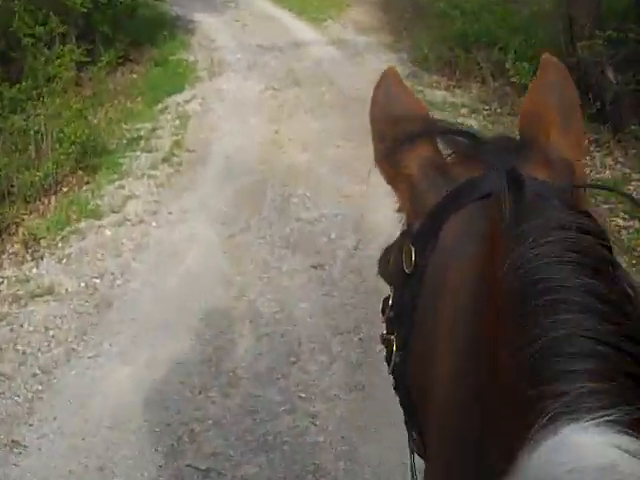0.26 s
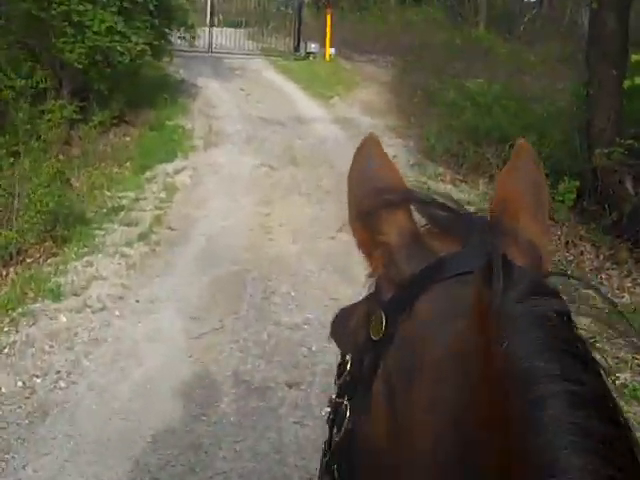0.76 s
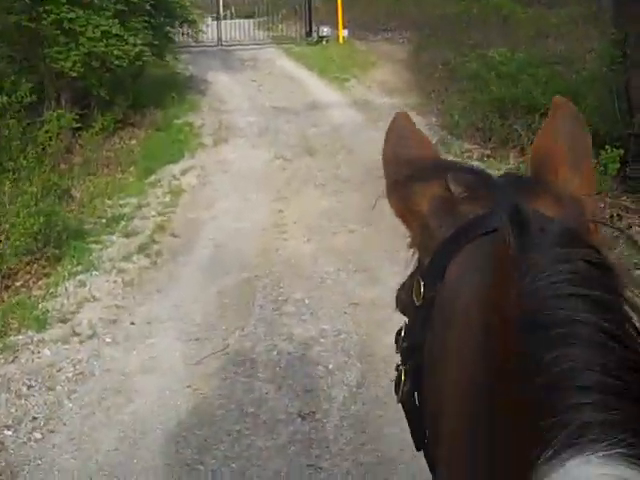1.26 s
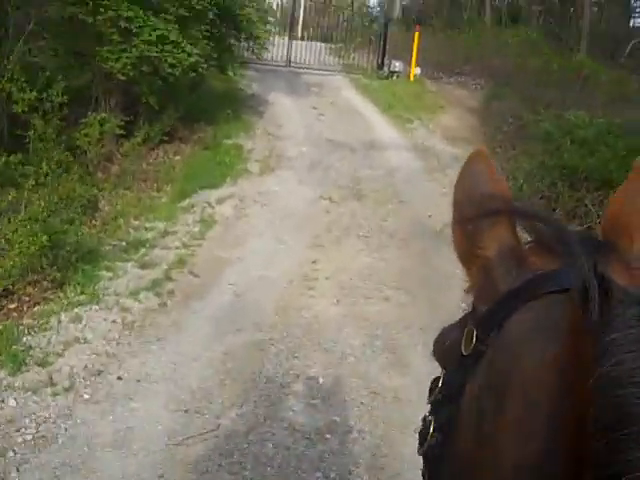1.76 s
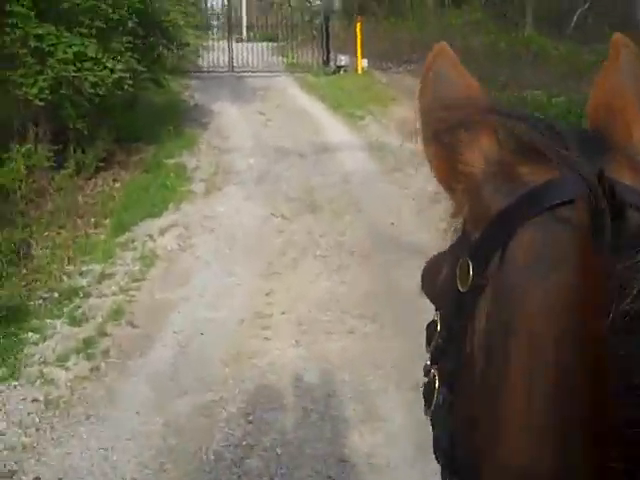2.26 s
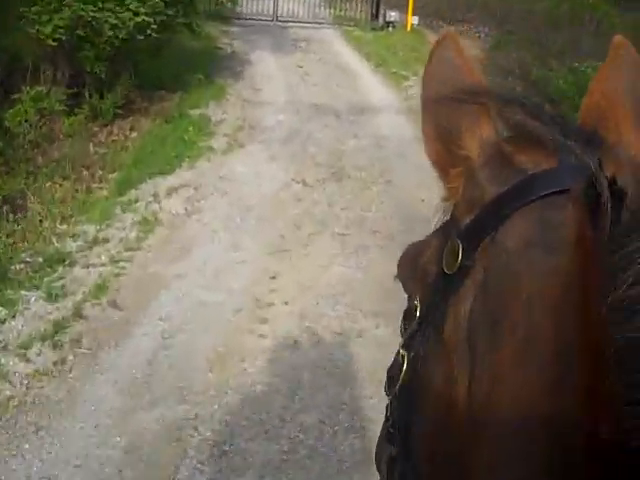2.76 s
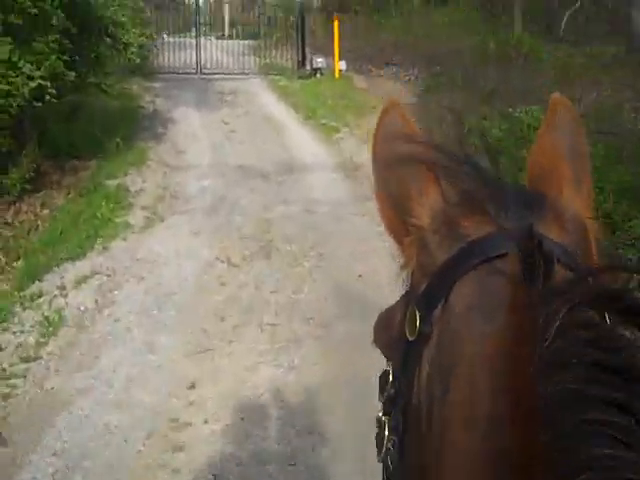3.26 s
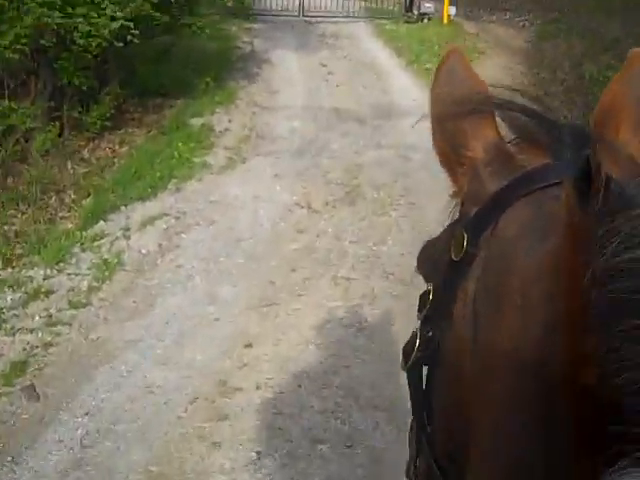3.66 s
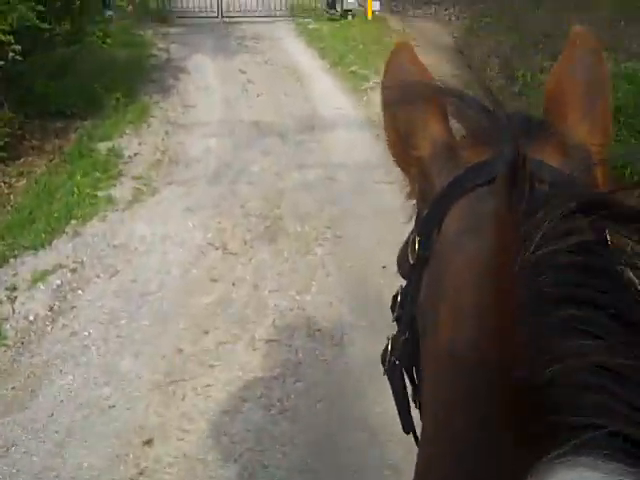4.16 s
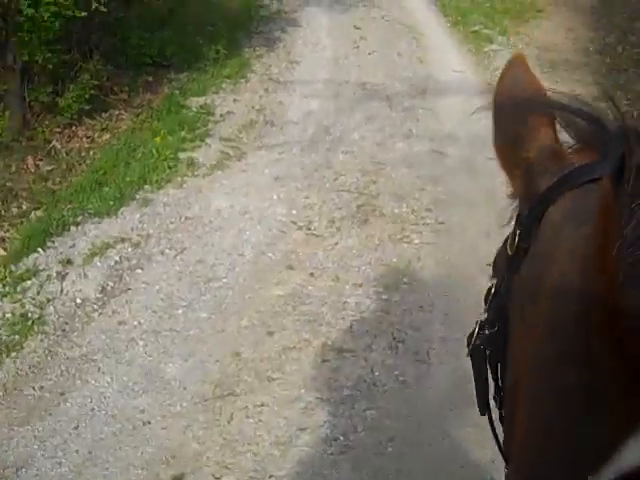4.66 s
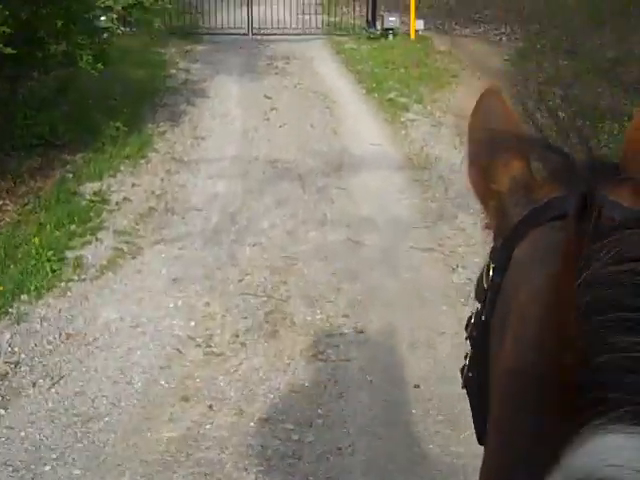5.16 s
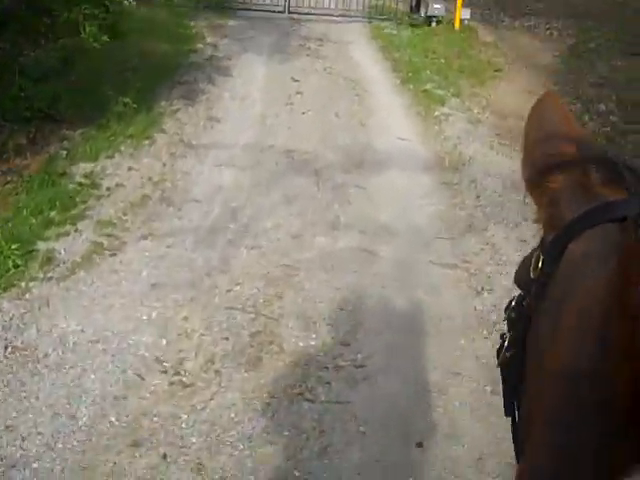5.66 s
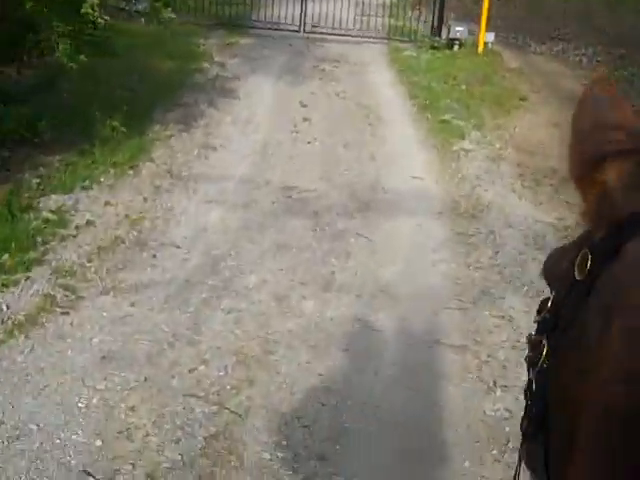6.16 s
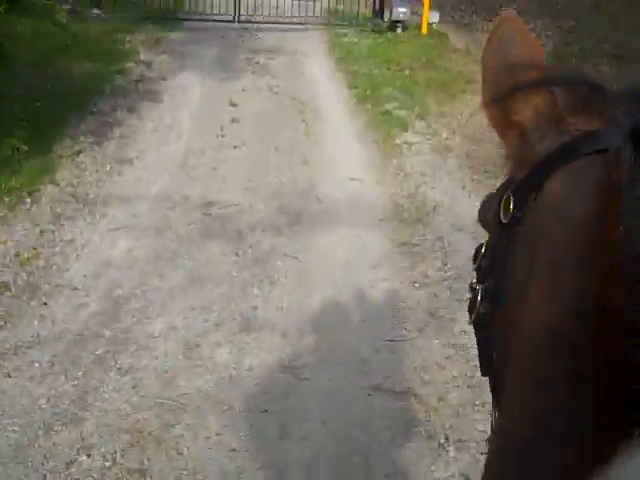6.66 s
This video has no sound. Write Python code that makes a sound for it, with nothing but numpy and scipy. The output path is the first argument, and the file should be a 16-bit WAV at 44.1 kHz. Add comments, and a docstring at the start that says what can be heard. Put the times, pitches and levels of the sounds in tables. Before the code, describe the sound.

A horse walks along a gravel drive between trees, heard close from the saddle. Hooves thud and crunch steadily, mixed with sharp clicks and small bridle jingles over a soft rustle of leaves. Wind buffets the microphone at the start. A bird then whistles a brief phrase, after which the hooves knock more hollowly. The gusts return near the end, along with the loudest click.

```python
"""A horse walks down a gravel drive between trees, heard from a small camera in the rider's hand.
From the start hooves thud and gravel crunches over rustling leaves, sharp clicks ring in short hollow
modes, the bridle jingles and gusts buffet the two microphone ports. Just after 2 s a bird whistles two
arches, between short notes, into the wood. From about 3 s the hooves knock more hollowly. Near 6 s
the gusts pick up again, and the loudest click lands at 6.3 s."""
import sys
import numpy as np
from scipy import signal
from scipy.fft import rfft, irfft
from scipy.io import wavfile
from scipy.ndimage import uniform_filter1d

SR = 44100
rng = np.random.default_rng(int(sys.argv[2]) if len(sys.argv) > 2 else 0)


def dump_mix(stems):
    """Bounce the given channels to the path in sys.argv[1] as a 16-bit WAV at rate SR."""
    frames = np.atleast_2d(stems).T  # one column per channel
    limited = np.clip(frames, -1, 1)  # hard clip at full scale
    pcm = np.round(limited * 32767).astype(np.int16)
    wavfile.write(sys.argv[1], SR, pcm)


N = 304290

# tone of the left port over the right: f/Hz, level/dB
PORT_TILT = [(250, 0.5), (700, -1.5), (2500, 1.5), (6000, -0.5), (8000, 7), (11500, 10), (13700, 8.5)]
# spectrum of leaves and microphone hiss: f/Hz, level/dB
AIR_EQ = [(59, -4.5), (100, -7), (259, -1.5), (590, -7), (949, -5.5), (1730, -13.5), (2560, -13),
          (4850, -14.5), (7800, -7), (9990, -23), (14000, -26), (14400, -75)]
# how alike that bed is in both ports: f/Hz, correlation
AIR_LIKENESS = [(60, 0.95), (240, 0.97), (950, 0.94), (3760, 0.018), (15000, 0.043)]
# gusts: middle t/s, length/s, left level/dB, right level/dB
GUSTS = [(0.256, 0.13, -27.5, -41), (0.436, 0.028, -27, -32), (0.515, 0.026, -22.5, -27),
         (0.554, 0.019, -20.5, -37), (0.527, 0.19, -36, -36.5), (1.127, 0.024, -22.5, -24.5),
         (1.2, 0.2, -41, -42.5), (1.275, 0.034, -34, -51), (4.374, 0.26, -47, -50),
         (5.719, 0.084, -37.5, -64), (5.839, 0.04, -37.5, -38), (6.137, 0.17, -33, -37),
         (6.488, 0.058, -27, -49), (6.55, 0.02, -19.5, -36), (6.595, 0.074, -35.5, -43)]
# spectrum of wind on a port: f/Hz, level/dB
BUFFET_EQ = [(30, -32), (70, -4), (130, -3), (190, -9.5), (280, -14.5), (900, -67)]

# cues for the bird's arches and short pips: t/s, level/dB
ARCH_CUES = [(2.26, -38.5), (2.501, -39)]
PIP_CUES = [(2.15, -49), (2.4, -48), (2.64, -45.5)]
# contours of an arch, a pip and the falling lead-in: t/s into the note, f/Hz, level/dB
ARCH_SHAPE = [(0, 2565, -44), (0.027, 2773, 3.5), (0.058, 2980, 6), (.092, 2958, 7), (.122, 2104, -2)]
PIP_SHAPE = [(0, 2070, -2), (.025, 2250, 5), (.06, 2300, -13)]
LEAD_IN_SHAPE = [(0, 2510, -51), (.03, 2090, -49)]

# gravel shoved aside by a hoof: peak t/s, length/s, crunch level/dB, rattle level/dB
SCUFFS = [(0.368, 0.12, -42, -42.5), (0.836, 0.67, -53.5, -53), (1.095, 0.043, -39, -37.5),
          (1.36, 0.29, -49.5, -51), (1.793, 0.2, -48, -46), (2.29, 1, -54, -60.5),
          (2.511, 0.077, -65, -41.5), (3.187, 0.12, -49, -50), (3.46, 0.35, -44.5, -67),
          (3.648, 0.16, -48, -39), (4.05, 0.043, -38, -27.5), (4.413, 0.57, -44, -49),
          (4.565, 0.13, -54, -48), (4.994, 0.51, -60, -48), (5.244, 0.14, -56, -42),
          (5.473, 0.3, -52.5, -44.5), (5.946, 0.14, -56, -46), (6.132, 0.22, -66, -45),
          (6.342, 0.24, -54, -48), (6.568, 0.086, -67, -41.5), (6.677, 0.076, -36, -55),
          (6.734, 0.078, -37, -43), (6.853, 0.19, -46.5, -58)]
# spectra of the gravel's low crunch and high rattle: f/Hz, level/dB
CRUNCH_EQ = [(150, -10), (300, -1.5), (700, -7.5), (1000, -4), (1700, -16.5), (7000, -40)]
RATTLE_EQ = [(1500, -0.5), (2550, -1.5), (3300, -0.5), (5000, -2.5), (7300, 3.5), (10000, -9), (14000, -51)]
# stones of three sizes knocking together: f/Hz
STONES_HZ = (702, 940, 1320)

# pitched clinks: t/s, level/dB, f/Hz
CLINKS = [(0.708, -36, 3280), (0.708, -28, 7030), (1.6462, -25, 5730), (1.787, -24, 6720),
          (2.875, -17.5, 7480), (2.893, -43, 7600), (3.37, -33, 6450), (6.0474, -31, 5450),
          (6.454, -26.5, 7420), (6.534, -34, 7850), (6.542, -27, 6840)]
# a clink's quick and lingering decays: level/dB, t60/s
CLINK_DECAYS = [(8, 0.017), (-24, 0.029)]
# bridle jingles: t/s, level/dB
JINGLES = [(0.346, -34), (0.3654, -25), (0.403, -31.5), (0.4607, -35.5), (0.61, -37.5), (0.659, -34),
           (0.8653, -29.5), (1.3221, -30), (1.3434, -27), (1.4575, -31.5), (1.596, -29.5), (1.6038, -35),
           (1.709, -27.5), (2.2072, -35.5), (2.9301, -32.5), (3.4163, -28), (3.64, -33), (4.243, -37),
           (4.3505, -30), (4.3582, -39), (4.436, -33), (4.4505, -30), (4.9172, -33.5), (4.9325, -35),
           (5.0259, -29.5), (5.0327, -25.5), (5.221, -29), (5.294, -23.5), (5.3503, -34.5), (5.762, -42),
           (5.7847, -36), (5.796, -41), (5.9255, -27), (6.083, -33.5), (6.233, -33), (6.2552, -30),
           (6.283, -20), (6.4487, -41)]
# sharp clicks: t/s, level/dB, low ring offset/dB, middle ring offset/dB
CLICKS = [(0.2181, -36, -40, -26), (0.4296, -33, -20, -10), (0.7068, -29, -42, -19),
          (0.8228, -17.5, -17, -22), (1.361, -28, -3, 2), (1.6361, -20, 0, -0.5), (1.647, -24, -11, -33),
          (1.7869, -20, -11, -7), (2.2413, -37.5, -16, 2), (2.2514, -31, -9, 1), (2.4344, -31, -7.5, 1),
          (2.4673, -33, -7, -4), (2.4886, -22.5, -15, -31), (2.585, -30.5, -29, -10),
          (2.8752, -34, -54, -40), (3.024, -19, -23, -22), (3.1566, -35, -7, 3), (3.163, -31.5, -13, -2),
          (3.192, -33.5, -15, -2), (3.2263, -35.5, -17, -3), (3.2365, -35.5, -18, -10),
          (3.5029, -29.5, -14, -9), (4.0196, -25, -18, -27), (4.0327, -21.5, -16, -16),
          (4.0488, -35, -1.5, -30), (4.2216, -34.5, -14.5, -12), (4.343, -28.5, -6, 1),
          (4.3877, -18, -7, -1), (4.5173, -32.5, -9, -30), (4.5638, -32, -11, -21),
          (4.8394, -28.5, -10, -19), (5.272, -21, -3, 1.5), (5.3269, -33, -15, -10),
          (5.4341, -33.5, -0.5, 0.5), (5.4599, -28.5, -33, -24), (5.751, -29.5, -25, -27),
          (5.8378, -28.5, -6, 9), (5.8435, -29.5, -7, -1), (5.88, -26, -0.5, 2.5),
          (5.9418, -26.5, -22, -17), (6.048, -32.5, -30, -20), (6.0566, -28.5, -7, 1),
          (6.072, -27.5, -27, -6), (6.126, -30, -17, -6), (6.176, -29.5, -39, -33),
          (6.271, -10.5, -12, -1.5), (6.294, -32, -25, 3.5), (6.4166, -33.5, -7.5, -1),
          (6.4552, -33, -36, -39), (6.5338, -28, -26, -20), (6.7309, -28, -8.5, -2), (6.742, -34.5, -18, 6),
          (6.7792, -30, -33, -5.5)]
# a click's low, middle and bright modes: f/Hz, level/dB, nominal t60/s
CLICK_MODES = [(2560, 14, 0.017), (4074, 8.5, 0.013), (6090, 7, 0.0021)]
# EQ of a click's snap and grit: f/Hz, level/dB
SNAP_EQ = [(300, -31), (800, -7.5), (3300, -4.5), (5700, 3), (7600, 7), (10000, -9), (14000, -18.5),
           (15500, -47)]

# hoof beats: t/s, level/dB, thud f/Hz, knock offset/dB
HOOF_BEATS = [(0.099, -33, 464, -35), (0.583, -34.5, 430, -17), (0.839, -35.5, 330, -26),
              (1.062, -34.5, 453, -22), (1.311, -31.5, 404, -14), (1.547, -32.5, 274, -25),
              (1.727, -37, 400, -9), (1.786, -32.5, 356, -3), (2.023, -31.5, 463, -11.5),
              (2.278, -30.5, 353, -8), (2.498, -27.5, 254, -14.5), (2.683, -34, 382, -25),
              (2.716, -36, 262, -12), (2.944, -34, 454, -15), (3.152, -36, 298, 2), (3.397, -25, 265, -1.5),
              (3.559, -38, 476, -13), (3.611, -31, 417, -2.5), (3.841, -29.5, 468, -19),
              (4.015, -33, 418, 0), (4.298, -36.5, 382, -2.5), (4.514, -30.5, 294, 0.5),
              (4.753, -34.5, 272, -21), (4.838, -31.5, 485, -4.5), (4.948, -49.5, 507, 14.5),
              (4.994, -27, 325, 1.5), (5.222, -29.5, 276, -25), (5.458, -29.5, 234, -13),
              (5.665, -36, 257, -4), (5.894, -24, 266, -7), (5.935, -44.5, 231, 15.5),
              (6.117, -31, 239, -14), (6.306, -36.5, 420, -3.5), (6.391, -47.5, 400, 7.5),
              (6.743, -35.5, 295, 0)]
# modes of the ground: ratio to the thud pitch, level/dB, t60/s, rise/s
THUD_MODES = [(0.992, 7, 0.024, 0.00044), (1.5, -3.5, 0.04, 0.0016), (0.555, -8, 0.062, 0.0027)]
# modes of the hoof wall: f/Hz, level/dB, t60/s
KNOCK_MODES = [(753, 8.5, 0.019), (1037, 15, 0.015)]


def gain(db):
    """Decibels to a factor."""
    return 10 ** (np.asarray(db) / 20)


def unit_rms(x):
    """Scales to rms 1."""
    return x / np.sqrt(np.mean(x ** 2) + 1e-20)


def curve(points):
    """Spreads a spectrum table over the FFT bins, on a log frequency axis."""
    hz, value = np.transpose(points)
    return np.interp(np.log(np.fft.rfftfreq(N, 1 / SR) + 1), np.log(hz + 1), value)


def eq(x, points):
    """Filters by a spectrum table."""
    return irfft(rfft(x) * gain(curve(points)), N)


def coloured(x, points):
    """EQ, then rms 1."""
    return unit_rms(eq(x, points))


def add(mix, s, sound):
    """Mixes a sound in at time s."""
    part = mix[round(s * SR):][:len(sound)]
    part += sound[:len(part)]


def ring(hz, db, t60, rise_s):
    """One mode with a quick attack and a decay."""
    t = np.arange(3000) / SR
    return gain(db - 60 * t / t60) * (1 - np.exp(-t / rise_s)) * np.sin(2 * np.pi * hz * t)


def envelope(cues, rise_s, t60):
    """An attack and a decay at each cue (t/s, level/dB)."""
    level, t = np.zeros(N), np.arange(round(t60 * SR)) / SR
    for s, db, *_ in cues:
        add(level, s, gain(db - 60 * t / t60) * (1 - np.exp(-t / rise_s)))
    return level


def grains(per_s, spread_db):
    """Sparse impulses of random sign; a few are large."""
    size = gain(spread_db * np.minimum(rng.exponential(1, N), 4)) * rng.choice([-1., 1.], N)
    return size * (rng.random(N) < per_s / SR)


def excite(x, response):
    """Plays x through an impulse response."""
    return signal.oaconvolve(x, response)[:N]


def flutter(x, swing_db):
    """Makes the level flutter within a few milliseconds."""
    wander = unit_rms(uniform_filter1d(rng.standard_normal(N), size=200))
    return x * gain(swing_db * np.tanh(wander))


def mottled_noise(swing_db):
    """Noise whose uneven colour shifts from moment to moment."""
    spectra = signal.stft(rng.standard_normal(N), nperseg=256)[2]
    blotches = uniform_filter1d(rng.standard_normal(spectra.shape), size=4, axis=0)
    blotches = unit_rms(uniform_filter1d(blotches, size=3, axis=1))
    return unit_rms(signal.istft(spectra * gain(swing_db * blotches), nperseg=256)[1][:N])


def echoes(x, t60, gap_samples):
    """A dying tail of sparse reflections of random sign, energy 1."""
    at = np.arange(60, round(t60 * SR), gap_samples)
    taps = np.zeros(round(t60 * SR) + gap_samples)
    reflections = rng.choice([-1., 1.], len(at)) * gain(-60 * at / SR / t60)
    taps[at + rng.integers(0, gap_samples, len(at))] = reflections
    return excite(x, taps / np.linalg.norm(taps))


def ports(left, right, lag_s=4.3e-5):
    """The two microphone ports differ in colour, and the left hears a little later."""
    hz = np.fft.rfftfreq(N, 1 / SR)
    half = gain(curve(PORT_TILT) / 2) * np.exp(-1j * np.pi * hz * lag_s)
    return irfft([rfft(left) * half, rfft(right) / half], N)


def air(level_db=-47):
    """A steady bed of leaf rustle and microphone hiss, centred in the lows and wide in the highs."""
    left, apart = (rfft(coloured(rng.standard_normal(N), AIR_EQ)) for _ in "lr")
    likeness = np.clip(curve(AIR_LIKENESS), 0, 1)
    right = likeness * left + np.sqrt(1 - likeness ** 2) * apart
    return gain(level_db) * ports(irfft(left, N), irfft(right, N))


def wind(rumble_db=-60.5):
    """Gusts of lumpy low pressure, unrelated in the two ports, over a faint steady rumble."""
    t, level = np.arange(N) / SR, np.full((2, N), gain(rumble_db))
    for s, length, *port_db in GUSTS:
        level += gain(port_db)[:, None] * np.exp(-(2 * (t - s) / length) ** 4)
    return level * [coloured(grains(per_s=170, spread_db=3), BUFFET_EQ) for _ in "lr"]


def bird(lead_in_s=2.1):
    """A gliding sine whistle that flutters through the leaves; the trees give it a long tail."""
    song = np.zeros(N)
    for cues, shape in (ARCH_CUES, ARCH_SHAPE), (PIP_CUES, PIP_SHAPE), ([(lead_in_s, 0)], LEAD_IN_SHAPE):
        s, hz, db = np.transpose(shape)
        t = np.arange(0, s[-1], 1 / SR)
        tone = np.sin(2 * np.pi * np.cumsum(np.interp(t, s, hz)) / SR)
        note = tone * gain(np.interp(t, s, db)) * signal.windows.tukey(len(t), 0.12)
        for start, note_db in cues:
            add(song, start, gain(note_db) * note)
    song = flutter(song, swing_db=3.5)
    return song + gain(-5.5) * flutter(echoes(song, t60=0.86, gap_samples=30), swing_db=2)


def gravel(rise_share=0.51, edge_db=-20):
    """Stones grind low and rattle high, with faint ringing ticks, swelling under each scuff."""
    t = np.arange(N) / SR
    level = gain([[-62], [-53.5]]) * np.ones(N)  # crunch and rattle of stones settling between steps
    for s, length, *peak_db in SCUFFS:
        from_peak = np.maximum((s - t) / rise_share, (t - s) / (1 - rise_share)) / length
        level += gain(peak_db)[:, None] * gain(edge_db * from_peak)
    knocks = sum(excite(grains(per_s=49, spread_db=6), ring(hz, 0, 0.017, 0.00068)) for hz in STONES_HZ)
    crunch = flutter(coloured(rng.standard_normal(N), CRUNCH_EQ), swing_db=7)
    hiss = mottled_noise(swing_db=4) + 0.52 * unit_rms(grains(per_s=500, spread_db=2))
    rattle = flutter(coloured(hiss, RATTLE_EQ), swing_db=9)
    ticks = flutter(excite(grains(per_s=320, spread_db=4), ring(*CLICK_MODES[0], 0.00054)), swing_db=7)
    low = unit_rms(crunch) + 0.55 * unit_rms(knocks)
    high = unit_rms(rattle) + 0.18 * unit_rms(ticks)
    return level[0] * low + level[1] * high


def clinks():
    """Each clink is one clear pitch with a quick and a lingering decay."""
    out = np.zeros(N)
    for s, db, hz in CLINKS:
        add(out, s, sum(ring(hz, db + part_db, t60, 0.00034) for part_db, t60 in CLINK_DECAYS))
    return out


def bridle_cues(trim_db=-11.5, low_db=1.2, mid_db=-0.44):
    """The bridle's jingles, cued as small clicks with more ring than snap."""
    return [(s, db + trim_db, low_db, mid_db) for s, db in JINGLES]


def clicks(cues):
    """A dry broad snap with grit behind it, and short rings that vary in tuning and damping."""
    rings, chance = np.zeros(N), rng.standard_normal((len(cues), len(CLICK_MODES), 3))
    for (s, db, low_db, mid_db), stray in zip(cues, chance):
        mix_db = db + np.r_[low_db, mid_db, 6 * stray[2:, 0]]  # the bright mode's level is random
        for (hz, mode_db, t60), hit_db, (_, detune, hold) in zip(CLICK_MODES, mix_db, stray):
            decay_s = 0.81 * t60 * np.exp(0.41 * hold)
            add(rings, s, ring(hz * (1 + 0.02 * detune), mode_db + hit_db, decay_s, 0.00028))
    snap = envelope(cues, rise_s=0.00044, t60=0.0068) + 1.53 * envelope(cues, rise_s=0.00005, t60=0.0019)
    snap *= mottled_noise(swing_db=3.5)
    sand = rng.standard_normal(N) + unit_rms(grains(per_s=260, spread_db=5))
    grit = gain(-26) * envelope(cues, rise_s=0.012, t60=0.14) * flutter(sand, swing_db=10)
    # the low ring chatters on for a moment after the click
    shake = envelope([(s, db + low_db) for s, db, low_db, _ in cues], rise_s=0.00099, t60=0.065)
    chatter = excite(shake * grains(per_s=650, spread_db=2.5), ring(*CLICK_MODES[0], 0.00031))
    return rings + gain(-18) * chatter + gain(11.5) * eq(snap + grit, SNAP_EQ)


def hooves(body_delay_s=0.00301):
    """Each landing grinds the gravel, thuds the ground and knocks the hollow hoof wall."""
    body, detunes = np.zeros(N), rng.uniform(0.84, 1.139, (len(HOOF_BEATS), len(KNOCK_MODES)))
    for (s, db, thud_hz, knock_db), detune in zip(HOOF_BEATS, detunes):
        thud = sum(ring(ratio * thud_hz, db + mode_db, t60, rise_s)
                   for ratio, mode_db, t60, rise_s in THUD_MODES)
        knock = sum(ring(hz * ratio, db + knock_db + mode_db, t60, 0.0013)
                    for (hz, mode_db, t60), ratio in zip(KNOCK_MODES, detune))
        add(body, s + body_delay_s, -thud - knock)
    bite = 2.2 * envelope(HOOF_BEATS, rise_s=0.00093, t60=0.03)
    tail = envelope(HOOF_BEATS, rise_s=0.00022, t60=0.18)
    grind = (bite + tail) * coloured(rng.standard_normal(N), CRUNCH_EQ)
    # loose ground passes little deep bass into the air
    return eq(body, [(70, -3.5), (200, 2)]) + gain(-10) * grind


def scene():
    """Horse and bird reach each port with its own echoes off the ground, over air and wind."""
    steps = hooves()
    bright = clicks(CLICKS + bridle_cues()) + clinks() + gravel()
    song = bird()
    direct = steps + bright + gain(-3) * song
    send = gain(-23.5) * steps + gain(-7) * bright + gain(1) * song
    left, right = (direct + echoes(send, t60=0.057, gap_samples=25) for _ in "lr")
    return ports(left, right) + air() + wind()


def record(dry):
    """The loudest click clips, then a steep low-pass takes off the very top."""
    low_pass = signal.firwin(511, cutoff=15570, window=("kaiser", 9), fs=SR)
    return signal.oaconvolve(np.clip(dry, -1, 1), low_pass[None], "same")


dry = scene()
out = record(dry)
dump_mix(out)
```